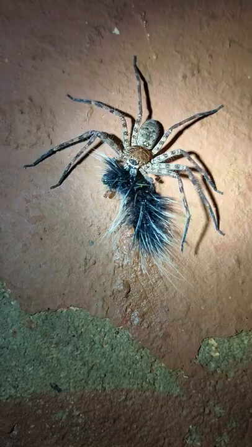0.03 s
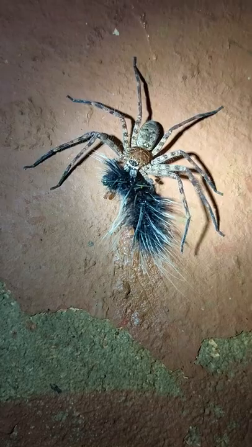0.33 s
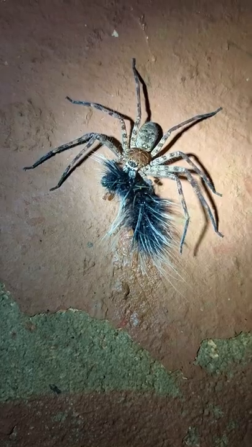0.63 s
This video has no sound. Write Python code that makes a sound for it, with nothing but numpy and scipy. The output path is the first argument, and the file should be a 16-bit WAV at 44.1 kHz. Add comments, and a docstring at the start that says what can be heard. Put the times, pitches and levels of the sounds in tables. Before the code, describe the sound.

A single-cylinder engine, probably a generator, fades in and thuds steadily some way off to the left at night, with light clatter, whine and airy exhaust noise. In the second half, a few faint ticks sound close on the right.

```python
"""A steady thud fades in some way off to the left: a single-cylinder engine at night, probably a generator.
Each firing booms through the silencer and off nearby walls; the casing clatters and whines in step.
Behind it lie a wash of air and the exhaust's turbulent roar, puffing with each firing.
A few faint ticks sound close to the microphone, on the right."""
import sys
import numpy as np
from scipy import signal
from scipy.fft import rfft, irfft
from scipy.io import wavfile
from scipy.ndimage import uniform_filter1d

SR = 44100
rng = np.random.default_rng(int(sys.argv[2]) if len(sys.argv) > 2 else 0)


def persist_wave(psi):
    """Save psi, clipped to +-1, as 16-bit WAV."""
    counts = np.round(np.clip(psi, -1, 1) * 32767).astype(np.int16)
    wavfile.write(sys.argv[1], SR, np.atleast_2d(counts).T)


N = 176400


def amp(db):
    """Decibels to amplitude."""
    return 10 ** (np.asarray(db) / 20)


def bump(x, centre, width):
    """A bell curve of height 1."""
    return np.exp(-((x - centre) / width) ** 2)


def read(table, hz, column=1):
    """One column of a table, joined by lines on a log-frequency axis."""
    table = np.array(table)
    return np.interp(np.log(hz + 1), np.log(table[:, 0] + 1), table[:, column])


def drift(rate_hz):
    """A slow random wander of rms 1, up to about rate_hz."""
    size = 1024
    hz = np.fft.rfftfreq(size, N / SR / size)
    slow = irfft(rfft(rng.standard_normal(size)) / np.sqrt(1 + (hz / rate_hz) ** 4))
    slow /= slow.std()
    ramp = np.linspace(0, 1, N // (size - 1) + 1, endpoint=False)
    return (slow[:-1, None] + np.diff(slow)[:, None] * ramp).ravel()[:N]


def partial(cycles, angle, waver, waver_hz):
    """A tone of rms near 1 locked to the engine, wavering in level and phase."""
    phase = 2 * np.pi * cycles + angle
    return (2 ** .5 + waver * drift(waver_hz)) * np.cos(phase) + waver * drift(waver_hz) * np.sin(phase)


def engine_cycles():
    """The running count of cycles, with firings on whole numbers, and the mean firing rate in Hz."""
    # engine speed: (time [s], firing rate [Hz])
    speed = [(0.41, 24.44), (0.82, 24.41), (1.23, 24.49), (1.64, 24.44), (2.05, 24.42), (2.46, 24.44),
             (2.87, 24.46), (3.28, 24.46), (3.68, 24.52)]
    times, rates = np.transpose(speed)
    t, firing_s = np.arange(N) / SR, .1864  # the moment of one firing
    cycles = np.cumsum(np.interp(t, times, rates)) / SR
    return cycles - np.interp(firing_s, t, cycles), rates.mean()


def puffing_turbulence(cycles):
    """Two patchy noises that puff with each firing; a faint hollow note swells once in them."""
    # swing of the noise over each cycle: (frequency [Hz], depth [dB])
    puff = [(100, -1.2), (350, 1.6), (800, 0.9), (2500, 0.5), (6000, .5), (14000, 0.6)]
    puff_lag, patch_db, swell_db = 0.24, 1.23, 7.1  # lag in cycles after the firing
    hz, t, spectra = signal.stft(rng.standard_normal((2, N)), SR, nperseg=256, noverlap=192)
    patches = uniform_filter1d(rng.standard_normal(spectra.shape[1:]), size=4, axis=0)
    patches = uniform_filter1d(patches, size=40, axis=1)
    beat = np.cos(2 * np.pi * (np.interp(t * SR, np.arange(N), cycles) - puff_lag))
    swell = swell_db * bump(t, centre=3.0, width=0.093) * bump(hz, centre=500, width=90)[:, None]
    spectra *= amp(read(puff, hz)[:, None] * beat + patch_db * patches / patches.std() + swell)
    return signal.istft(spectra, SR, nperseg=256, noverlap=192)[1][:, :N]


def roar(cycles):
    """Exhaust turbulence and air behind the engine, coloured by the casing and thinning into hiss."""
    # roar and air before trim and resonances: (frequency [Hz], left density [dB], right density [dB])
    spectrum = [(22, -80.2, -80.7), (75, -67.5, -74), (108, -66.5, -72.5), (152, -54.5, -62),
                (220, -60, -64.5), (269, -70.5, -69.5), (330, -60.5, -66.5), (495, -63, -70),
                (622, -71.5, -87), (750, -69.5, -88.5), (1050, -76, -88), (1660, -76, -82.5),
                (1960, -76.5, -78.5), (2250, -78, -83.5), (3350, -83.5, -85.5), (4200, -93.5, -90.5),
                (5500, -97, -88.5), (6300, -91, -89.5), (7530, -96, -83.5), (8900, -99.9, -97.5),
                (11700, -100.5, -106.4), (13700, -99.8, -106.3), (15300, -107.6, -111.9)]
    # likeness of the two sides at the microphone: (frequency [Hz], correlation [-1 to 1])
    correlation = [(60, 0.68), (150, 0.88), (340, 0.83), (640, 0.24), (1400, -0.41), (3000, 0.074),
                   (15000, -0.0065)]
    # casing resonances: (frequency [Hz], width [Hz], boost [dB])
    resonances = [(1180, 23, 1), (1637, 40, 1.5), (2265, 77, 4)]
    trim_db = -1
    common, separate = rfft(puffing_turbulence(cycles))
    hz = np.fft.rfftfreq(N, 1 / SR)
    alike = read(correlation, hz)
    left = common * amp(read(spectrum, hz, column=1))
    right = (alike * common + np.sqrt(1 - alike ** 2) * separate) * amp(read(spectrum, hz, column=2))
    colour_db = sum(db * bump(hz, centre, width) for centre, width, db in resonances)
    return np.sqrt(SR / 2) * irfft(np.array([left, right]) * amp(trim_db + colour_db), N)


def ticks():
    """Tiny dry snaps close by on the right, each one sharp pulse in a broad band."""
    # snaps near the microphone: (time [s], right peak [dB], centre [Hz], width [octaves])
    snaps = [(2.4403, -23.5, 3000, 0.81), (2.818, -28, 3200, .9), (2.940, -36, 7000, .4),
             (3.101, -34, 6800, .4), (3.2617, -31, 6800, .3), (3.9715, -29, 7000, 0.27)]
    out, size, left_db = np.zeros((2, N)), 512, -19
    hz = np.fft.rfftfreq(size, 1 / SR)
    for at_s, peak_db, centre_hz, octaves in snaps:
        band = np.exp(-.5 * (np.log2((hz + 1) / centre_hz) / octaves) ** 2)
        snap = np.roll(irfft(band), size // 2)
        start = round(at_s * SR) - size // 2
        out[:, start:start + size] += amp([[peak_db + left_db], [peak_db]]) * snap / snap.max()
    return out


def casing(cycles, firing_hz):
    """The casing clatters every cycle; a few multiples of the firing rate ring out as a whine."""
    # casing and gears ringing, each on the nearest multiple: (frequency [Hz], left [dB], right [dB])
    whine = [(758, -56, -64.5), (807, -59.5, -69), (880, -72, -78), (1076, -54.5, -68), (1174, -59.5, -58),
             (1198, -55, -77), (1443, -56.5, -68), (1565, -62.5, -57.5), (1633, -67, -60.5),
             (1663.4, -49.5, -59), (2265, -58, -71)]
    # clatter on each of the other multiples: (frequency [Hz], left [dB], right [dB])
    clatter = [(533, -60.5, -61.5), (895, -64, -64), (1610, -67.5, -80), (2230, -74.5, -75),
               (3200, -78, -105)]
    out, trim_db = np.zeros((2, N)), -1  # the trim lowers both tables
    ringing = {round(hz / firing_hz): levels for hz, *levels in whine}
    for multiple in range(22, 125):  # above the exhaust note
        for side, angle in enumerate(rng.uniform(0, 2 * np.pi, 2)):
            if multiple in ringing:
                level_db = ringing[multiple][side]
                tone = partial(multiple * cycles, angle, waver=0.59, waver_hz=6.9)
            else:
                level_db = read(clatter, multiple * firing_hz, column=side + 1)
                tone = partial(multiple * cycles, angle, waver=0.5, waver_hz=5.5)
            out[side] += amp(trim_db + level_db) * tone
    return out


def exhaust(cycles, firing_hz):
    """Each firing arrives by silencer and walls as a thump, a bark and a late boom, no two equally strong."""
    # exhaust note, off to the left: (multiple [of the firing rate], left [dB], right [dB])
    harmonics = [(2, -41.5, -49.5), (3, -37.5, -40), (4, -47.5, -59), (5, -81, -85), (6, -25, -30),
                 (7, -32, -38.0), (8, -33, -40), (9, -52, -62.0), (10, -53, -62.5), (11, -65.5, -69),
                 (12, -47, -57), (13, -42, -51), (14, -37.5, -44.5), (15, -41.4, -48.5), (16, -49, -55),
                 (17, -49.5, -51.5), (18, -50, -58), (19, -52, -66.5), (20, -51, -61), (21, -56.2, -78)]
    # travel through silencer and yard: (frequency [Hz], delay [s])
    delays = [(60, .003), (86, .0056), (110, .023), (135, .014), (159, .039), (183, .035), (208, .028),
              (235, .012), (305, .002), (330, .010), (355, .010), (380, .020), (430, .028), (500, .024)]
    # slow rise and fall of the exhaust: (time [s], level [dB])
    slow_level = [(.5, -.4), (.8, 0), (1.35, -0.6), (1.6, -0.4), (1.85, -0.3), (2.3, 0.8), (2.6, 0.04),
                  (3.3, 0.34), (3.9, -0.6)]
    trim_db, firing_spread_db = 0.06, 0.27
    out, angle = np.zeros((2, N)), 0
    for multiple, left_db, right_db in harmonics:
        # the delay sets the phase step from one harmonic to the next
        angle -= 2 * np.pi * firing_hz * read(delays, (multiple - .5) * firing_hz)
        waver = 0.1 * multiple * firing_hz / 300  # higher harmonics waver more
        out += amp([[left_db], [right_db]]) * partial(multiple * cycles, angle, waver, waver_hz=4.0)
    slow_db = np.interp(np.arange(N) / SR, *np.transpose(slow_level))
    return out * amp(trim_db + slow_db + firing_spread_db * drift(firing_hz / 2))


def scene():
    """The engine's three voices at a distance, all in step, and the ticks close by."""
    cycles, firing_hz = engine_cycles()
    return exhaust(cycles, firing_hz) + casing(cycles, firing_hz) + roar(cycles) + ticks()


def record(dry):
    """The microphone input opens and fades up to full level; the highest treble is cut off."""
    open_s, fade_s, opening_gain, closed_db = 0.15, 0.19, 0.1, -78.5
    cutoff_hz = 15400
    since_open = np.arange(N) / SR - open_s
    rise = 1 - (1 - opening_gain) * np.exp(-np.maximum(since_open, 0) / fade_s)
    fade = np.where(since_open < 0, amp(closed_db), rise)
    lowpass = signal.firwin(511, cutoff_hz, window=("kaiser", 9), fs=SR)
    return signal.oaconvolve(dry * fade, lowpass[None], "same")


dry = scene()
out = record(dry)
persist_wave(out)
```